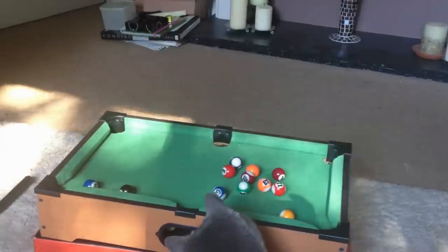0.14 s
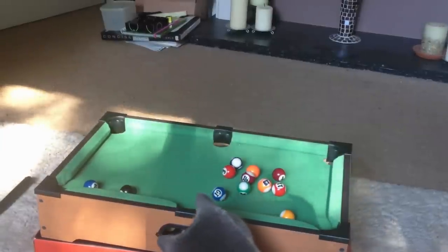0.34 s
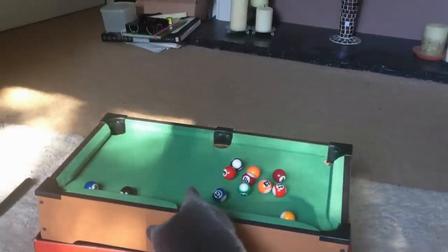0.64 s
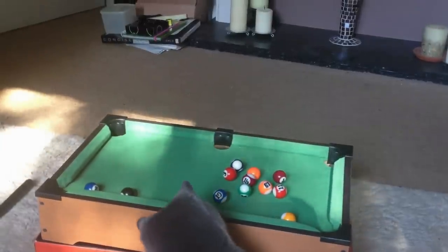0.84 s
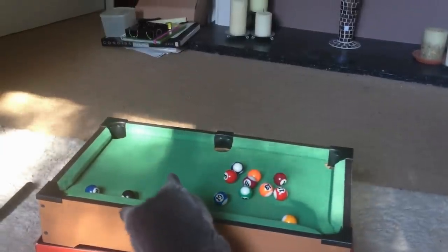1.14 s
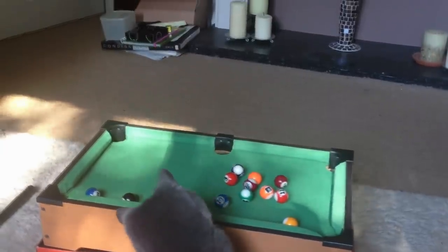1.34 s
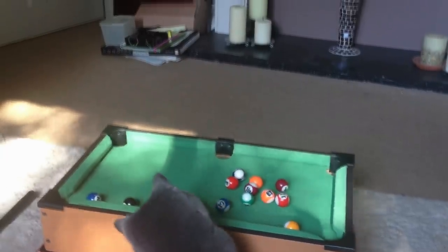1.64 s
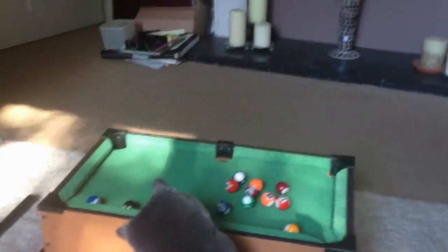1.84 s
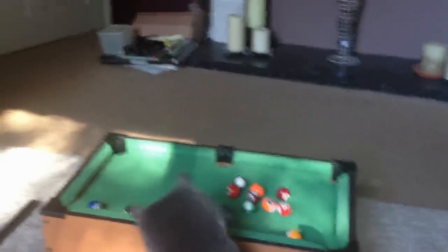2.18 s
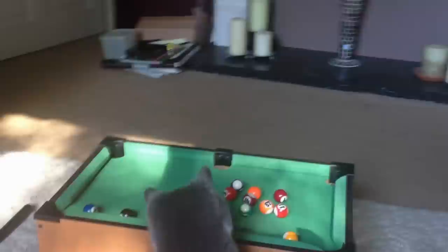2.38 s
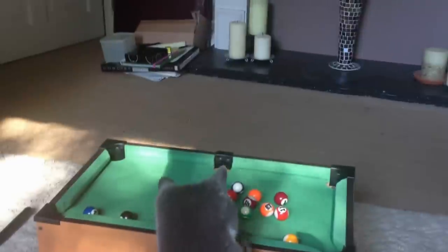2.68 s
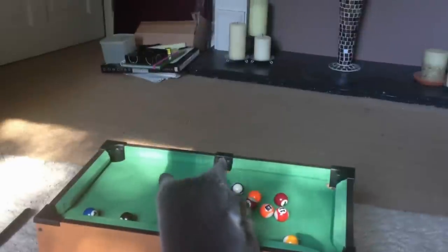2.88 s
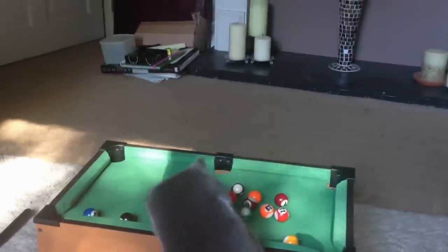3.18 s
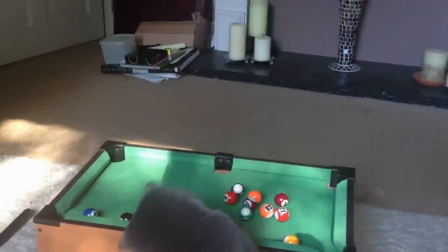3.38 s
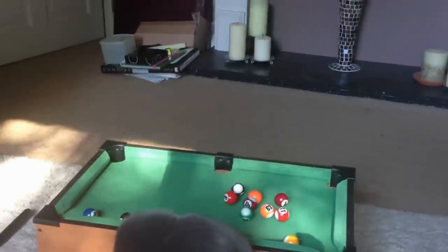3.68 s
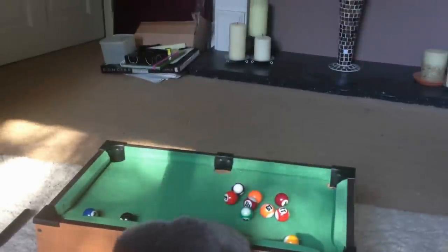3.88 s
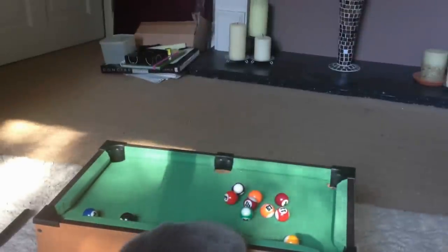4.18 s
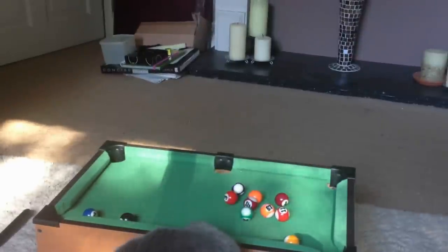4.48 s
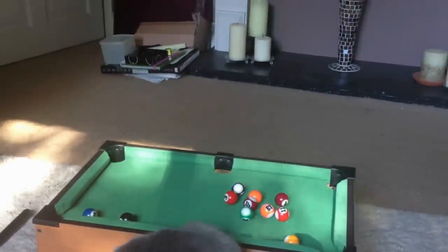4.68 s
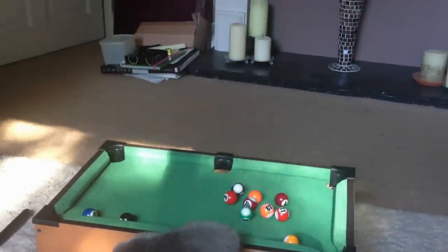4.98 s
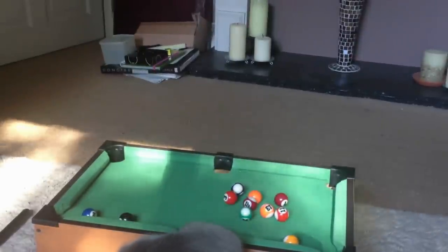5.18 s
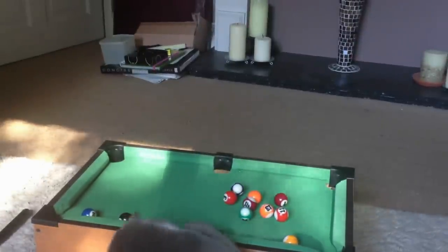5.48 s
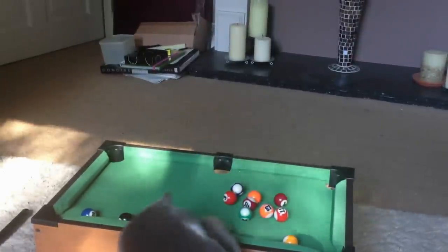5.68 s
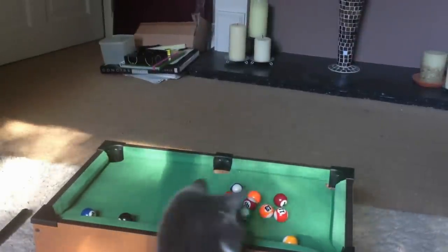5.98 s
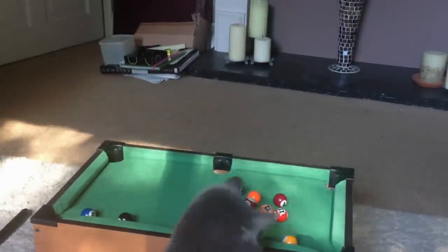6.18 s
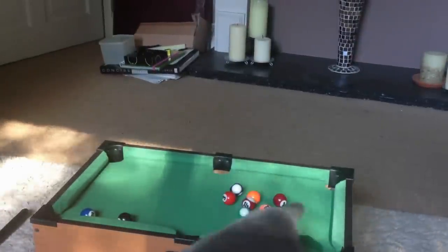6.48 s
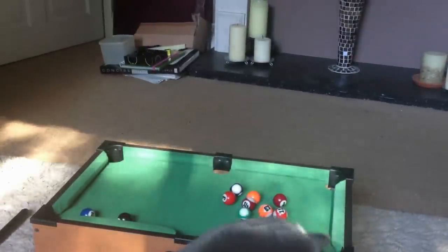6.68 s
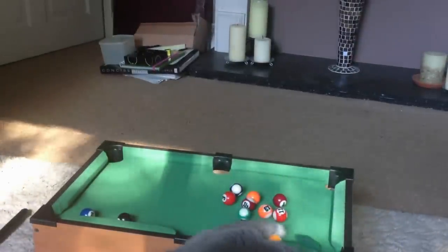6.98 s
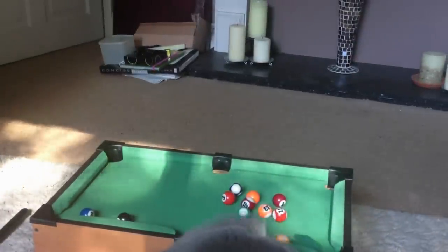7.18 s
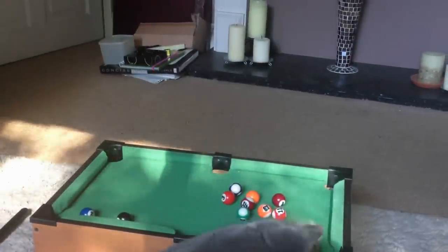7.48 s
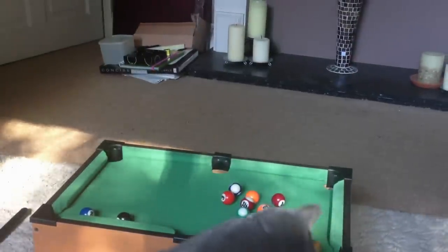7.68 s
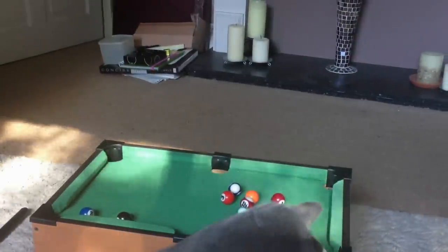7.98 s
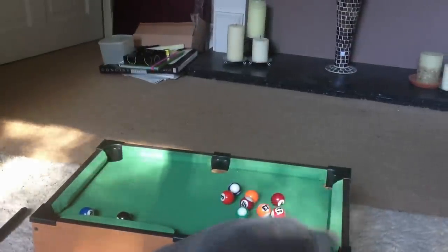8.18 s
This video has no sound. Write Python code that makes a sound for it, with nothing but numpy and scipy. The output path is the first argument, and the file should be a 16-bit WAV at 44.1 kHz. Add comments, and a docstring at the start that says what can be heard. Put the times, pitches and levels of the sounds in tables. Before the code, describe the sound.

In a quiet room, a cat paws small balls on a toy pool table. After a hushed second, the balls clack together and knock on wooden rails, then roll with dull bumps. More knocks and sharp clacks follow in loose clusters, mixed with light claw ticks. A lull holds only faint paw thuds before a ball bounces hard at a pocket and quickly settles. The small microphone picks up a short room ring.

```python
"""Small balls click together on a toy pool table as a cat paws them in a quiet living room.
Each contact is a crack that scatters through the table, wakes its modes and rings briefly in the room.
The balls knock on the wooden rails and rumble over the thin bed; the last bounces hard, as into a
pocket. In between, claws tick, paws thud on the cabinet and fur brushes the cloth."""
import sys
import numpy as np
from scipy import signal
from scipy.fft import rfft, irfft
from scipy.io import wavfile

SR = 44100
rng = np.random.default_rng(int(sys.argv[2]) if len(sys.argv) > 2 else 0)


def to_wav(sig):
    """Store sig (one row per channel, or 1-D mono) as 16-bit WAV at the path in sys.argv[1].

    Samples outside -1..1 are clipped; the rate is SR.
    """
    pcm = np.clip(np.atleast_2d(sig), -1, 1) * 32767
    pcm = np.round(pcm).astype(np.int16)
    wavfile.write(sys.argv[1], SR, pcm.T)  # frames by channels


N = 367792
AGE = np.arange(SR * 2 // 5) / SR   # time since a blow, s


def from_db(db):
    """Decibels to gain."""
    return 10 ** (np.asarray(db) / 20)


def unit(x):
    """Scale to an energy of one."""
    return x / np.sqrt(np.sum(x ** 2) + 1e-30)


def at_hz(points, hz):
    """Read a curve on a log-frequency axis."""
    f, value = np.transpose(points)
    return np.interp(np.log(np.maximum(hz, 1)), np.log(f), value)


def cut(x, hz, kind):
    """Butterworth filter."""
    return signal.sosfilt(signal.butter(2, hz, kind, fs=SR, output="sos"), x)


def equalise(x, curve, size=4096):
    """Minimum-phase EQ: nothing rings ahead of an attack."""
    cepstrum = irfft(np.log(from_db(at_hz(curve, np.fft.rfftfreq(size, 1 / SR)))))
    cepstrum[1:size // 2] *= 2
    cepstrum[size // 2 + 1:] = 0
    return signal.fftconvolve(x, irfft(np.exp(rfft(cepstrum))))[:len(x)]


def add(track, s, sound):
    """Mix a sound into a track at a time."""
    at = round(s * SR)
    track[at:at + len(sound)] += sound[:max(N - at, 0)]


def swells(rows, rise_db_per_s, fall_db_per_s):
    """Envelope of pushes that grow to a peak and die away."""
    t = np.arange(N) / SR
    return sum(from_db(db - np.maximum(rise_db_per_s * (s - t), fall_db_per_s * (t - s)))
               for s, db in rows)


# Room tone EQ: f/Hz, level/dB
HUSH_EQ = [(25, -14.5), (80, -5), (115, -8), (160, 0.5), (280, -1.5), (400, -4), (800, -8), (2800, -12),
           (5000, -14.5), (8300, -15.5), (10000, -23), (12500, -16.5), (15500, -20)]
def room_tone(level_db=-68):
    """The steady hush of a still room and microphone hiss."""
    return from_db(level_db) * np.sqrt(N) * unit(equalise(rng.standard_normal(N), HUSH_EQ))


# Reverb time: f/Hz, T60/s
ROOM_DECAY = [(120, 0.3), (320, 0.21), (800, 0.3), (2200, 0.31), (5800, 0.24), (13000, 0.22)]
def reflections(build_s=0.0072):
    """The room's answer to a click, new for every spot: octaves of noise that swell and decay."""
    tail = 0
    for hz in 125 * 2. ** np.arange(8):
        edges = hz / np.sqrt(2), min(hz * np.sqrt(2), SR / 2 - 1000)
        fade = (1 - np.exp(-AGE / build_s)) * from_db(-60 * AGE / at_hz(ROOM_DECAY, hz))
        tail += cut(rng.standard_normal(len(AGE)), edges, "band") * fade
    return unit(tail)


def ringing(modes, spread_db=2):
    """Damped sines; where the blow lands decides each one's strength and sign."""
    hz, width, db = np.transpose(modes)[:, :, None]
    strength = width * from_db(db + spread_db * rng.standard_normal(hz.shape))
    strength *= rng.choice([-1, 1], hz.shape)
    return unit(np.sum(strength * np.exp(-np.pi * width * AGE) * np.cos(2 * np.pi * hz * AGE), axis=0))


def voiced(sound, levels_db, crossovers_hz=(330, 750, 1400, 3800)):
    """Split a blow into boom, wood, knock, clack and edge; set each band's rms over the first 50 ms."""
    out = 0
    for hz, db in zip(crossovers_hz + (None,), levels_db):
        band = sound
        if hz:
            band = cut(cut(sound, hz, "low"), hz, "low")
            sound = cut(cut(sound, hz, "high"), hz, "high")
        out += band * from_db(db) / np.sqrt(np.mean(band[:SR // 20] ** 2))
    return out


def blows(hits, modes, eq, ring_db, scatter_db, scatter_s, wet_db, gain_db, ping_db=-13, ping_q=10):
    """A contact cracks, scatters through the table, wakes its modes and fills the room.
    A hit's level is its clack band before gain_db; boom, wood, knock and edge are relative to it."""
    out, click = np.zeros(N), signal.unit_impulse(len(AGE))
    scatter_fade = (1 - np.exp(-AGE / 0.0018)) * np.exp(-AGE / scatter_s)
    for s, db, click_db, ping_hz, boom, wood, knock, edge in hits:
        scatter = unit(rng.standard_normal(len(AGE)) * scatter_fade)
        room = from_db(wet_db) * reflections()
        crack = from_db(click_db) * click + from_db(scatter_db) * scatter + room
        ring = signal.fftconvolve(ringing(modes), click + from_db(-3) * room)[:len(AGE)]
        # each spot favours one resonance
        ping = signal.lfilter(*signal.iirpeak(ping_hz, ping_q, fs=SR), crack)
        sound = unit(equalise(crack, eq)) + from_db(ring_db) * unit(ring) + from_db(ping_db) * unit(ping)
        add(out, s, voiced(sound, db + np.array([boom, wood, knock, 0, edge])))
    return from_db(gain_db) * out


# Fur EQ: f/Hz, level/dB
FUR_EQ = [(80, -14.5), (300, 4), (1000, 1.5), (2800, -3), (4500, -12), (8300, -11), (15000, -32)]
# Peaks of the paw sweeps: t/s, level/dB
PAW_SWEEPS = [(1.335, -47.5), (1.61, -42), (2.36, -61), (2.945, -67), (4.64, -68), (7.21, -65.5),
              (7.78, -62)]
def fur_brushing():
    """Fur sweeps over the cloth: a soft hiss that swells with each stroke."""
    hiss = np.sqrt(N) * unit(equalise(rng.standard_normal(N), FUR_EQ))
    return swells(PAW_SWEEPS, rise_db_per_s=388, fall_db_per_s=266.5) * hiss


# Cabinet modes: f/Hz, width/Hz, level/dB
CABINET_RING = [(151.1, 22.4, -9), (233, 14, -5), (554, 29, -10)]
# Boomy cabinet EQ: f/Hz, level/dB
CABINET_EQ = [(70, -27), (150, -4), (300, -14), (700, -19.5), (1500, -26), (15000, -40)]
# Paw hits: t/s, level/dB, click/dB, ping/Hz, boom/dB, wood/dB, knock/dB, edge/dB
PAW_HITS = [(6.655, -90, -6, 247, 18, 28.3, 20, 4), (6.81, -87, -6, 178, 21, 2, -6, -2),
            (7.048, -85.5, -8, 228, 26, 18.4, -3, -1), (7.62, -85, 0, 175, 31, 26.7, 5, -2)]
def paw_thuds():
    """Soft paws wake the cabinet's low modes."""
    return blows(PAW_HITS, CABINET_RING, CABINET_EQ, ring_db=-2, scatter_db=0, scatter_s=0.0082,
                 wet_db=-0.5, gain_db=-1.5, ping_db=3, ping_q=16)


# Rumble EQ: f/Hz, level/dB
RUMBLE_EQ = [(60, -27.5), (140, -1), (260, 3), (480, 4), (800, -8), (1300, -13), (2600, -17.5),
             (4500, -23.5), (15000, -43)]
# Runs over the cloth: t/s, length/s, level/dB
BALL_RUNS = [(1.82, 0.22, -41.5), (2.24, 0.13, -62.5), (2.366, 0.61, -58), (3.72, 0.16, -51),
             (4.847, 0.93, -60.5), (7.418, 0.14, -55.5), (7.651, 0.31, -62.5), (8.077, 0.29, -48)]
# Hum peaks under a slowly pushed ball: t/s, level/dB
HUM_PEAKS = [(4.65, -54), (5.5, -61.5)]
def rolling(jolts_per_s=900, spread_db=3, speed_up_s=0.058, friction_db_per_s=12.5, stop_db_per_s=133):
    """Tiny uneven jolts of a rolling ball shake the bed; a creeping ball wakes only its lowest mode."""
    jolts = (rng.random(N) < jolts_per_s / SR) * rng.standard_normal(N)
    jolts *= from_db(spread_db * rng.standard_normal(N))
    rumble = equalise(signal.fftconvolve(jolts, reflections())[:N], RUMBLE_EQ)
    hum = cut(jolts, hz=(227, 263), kind="band")
    roll = np.zeros(N)
    for s, length_s, db in BALL_RUNS:   # the ball gathers speed, drags on the cloth and is stopped
        age = np.maximum(np.arange(N) / SR - s, 0)
        loss_db = friction_db_per_s * age + stop_db_per_s * np.maximum(age - length_s, 0)
        roll += np.minimum(age / speed_up_s, 1) * from_db(db - loss_db)
    creep = swells(HUM_PEAKS, rise_db_per_s=81, fall_db_per_s=137.5)
    return np.sqrt(N) * (roll * unit(rumble) + creep * unit(hum))


# Damped bed modes: f/Hz, width/Hz, level/dB
BUMP_RING = [(390, 94, 3.5), (944, 100, -3)]
# Dull bump EQ: f/Hz, level/dB
BUMP_EQ = [(80, -35), (200, 14), (400, -7), (1000, -11), (2300, -10), (4000, -36), (15000, -62)]
# Bump peaks before gain_db: t/s, level/dB
BUMP_HITS = [(2.257, -46.5), (2.322, -49.5), (2.508, -48), (2.535, -46), (2.562, -49.5), (2.611, -47.5),
             (2.648, -47.5), (2.679, -46.5), (2.739, -48), (2.78, -47), (2.844, -46)]
def rolling_bumps(gain_db=4, wet_db=-12, ring_db=3, soft_hz=1800):
    """A rolling ball bumps: a dull click and a swing or two of the bed, nearly dry."""
    out, click = np.zeros(N), signal.unit_impulse(len(AGE))
    for s, db in BUMP_HITS:
        ring = cut(ringing(BUMP_RING), soft_hz, "low")
        jolt = unit(equalise(click, BUMP_EQ)) + from_db(ring_db) * ring
        swing = signal.fftconvolve(jolt, click + from_db(wet_db) * reflections())
        add(out, s, from_db(db + gain_db) * swing / np.abs(swing).max())
    return out


# Claw tick modes: f/Hz, width/Hz, level/dB
CLAW_RING = [(2900, 120, -2.5), (4457, 130, -1.5), (5700, 120, -7), (8200, 300, -3.5)]
# Bright claw EQ: f/Hz, level/dB
CLAW_EQ = [(100, -19.5), (250, 0.5), (1000, -8), (1900, -7.5), (3000, 1.5), (5500, -7.5), (8500, 0),
           (10500, -12), (15000, -14)]
# Claw hits: t/s, level/dB, click/dB, ping/Hz, boom/dB, wood/dB, knock/dB, edge/dB
CLAW_HITS = [(1.2905, -43.5, -2, 3700, -34, -8, -27, -12.5),
             (1.5126, -44.5, 0.5, 3950, -11.5, -6.5, -9, -6.5),
             (1.835, -42.5, -8, 2900, -18.5, -8, -6.5, -7),
             (1.9912, -30, 2.5, 2900, -18.5, -20, -4.5, -7.5), (3.1117, -53, -14, 2840, -28, -31.5, -8, -7),
             (3.2916, -54.5, -7.5, 2980, -23.5, -4.5, -6.5, -5.5),
             (3.433, -47.5, -5.5, 2698, -3, -7, -5, -3.5), (8.0491, -39, -1.5, 8300, -5, -11, -16.5, -4.5),
             (8.0672, -38, 7, 8000, -19, -9, -31.5, -4)]
def claw_ticks():
    """Claws and grazing touches wake high, short-lived modes."""
    return blows(CLAW_HITS, CLAW_RING, CLAW_EQ, ring_db=-7, scatter_db=-1.5, scatter_s=0.0039,
                 wet_db=2, gain_db=-5.5)


# Bed modes: f/Hz, width/Hz, level/dB
BED_RING = [(238, 25, -8.5), (420, 24.6, 1), (750, 21, -1), (970, 20, -2), (1510, 72, -9.5), (2035, 56, -7)]
# Hollow bed EQ: f/Hz, level/dB
BED_EQ = [(120, -44), (204, -10.5), (319, -10), (407, -2.5), (598, -14), (899, -12.5), (995, -3.5),
          (1220, -15), (1990, -12), (2240, -22), (7920, -29.5), (15500, -51)]
# Bed hits: t/s, level/dB, click/dB, ping/Hz, boom/dB, wood/dB, knock/dB, edge/dB
BED_HITS = [(2.9488, -41.5, -20, 970, -5, 7.6, 6, -20), (3.3085, -55, -10, 975, -0.5, 9, 8, -14.5),
            (4.6445, -36.5, -8, 1990, -7.5, 4, -1, -14), (4.8517, -47.5, 0, 1980, -9.5, 5.9, 0, -14),
            (5.1602, -34, -11, 2040, -11.5, 5.5, -0.5, -11.5)]
def bed_taps():
    """A ball tapped against the thin bed rings it with a narrow ping."""
    return blows(BED_HITS, BED_RING, BED_EQ, ring_db=-2, scatter_db=1.5, scatter_s=0.005,
                 wet_db=1, gain_db=-3.5, ping_db=-7, ping_q=23)


# Rail modes: f/Hz, width/Hz, level/dB
RAIL_RING = [(447, 45, 0.5), (753, 50, 2.5), (1003, 70, -3), (1536, 21, -8.5), (1940, 96, -7),
             (2460, 83, -8.5), (3280, 60, -6.5)]
# Muffled cushion EQ: f/Hz, level/dB
CUSHION_EQ = [(100, -18), (220, 0.5), (450, -4), (1000, -3.5), (1500, -17), (2200, -15.5), (3500, -32),
              (8000, -26), (15000, -41)]
# Cushion hits: t/s, level/dB, click/dB, ping/Hz, boom/dB, wood/dB, knock/dB, edge/dB
CUSHION_HITS = [(1.152, -64, -2, 1020, 1, 5.9, 11.3, -30), (1.2238, -59.5, -4.5, 940, -10, 14.5, 14.8, -17),
                (2.372, -44, -8, 1440, -9, 3.7, 2.7, -24), (5.6964, -54, -8, 970, -10, 2, 1.8, -17),
                (7.4714, -63.5, -6, 1440, -6, 4.2, 13, 3)]
# Woody rail EQ: f/Hz, level/dB
RAIL_EQ = [(70, -53.5), (110, -28), (170, -19.5), (238, 0), (340, -10), (467, 4), (590, -10.5), (742, -2.5),
           (898, -15), (1160, -14.5), (2420, -4), (3300, -10.5), (4200, -16.5), (5900, -25.5), (8400, -19),
           (10500, -34), (15500, -40.5)]
# Rail hits: t/s, level/dB, click/dB, ping/Hz, boom/dB, wood/dB, knock/dB, edge/dB
RAIL_HITS = [(1.6346, -31, 1.5, 2330, -12.5, -1, 2, -10), (1.8472, -52, -12, 750, 0, 6, 19.5, -16),
             (1.985, -25.5, -4, 1030, -14, -8.5, 2, -19.5), (3.4715, -22.5, -2, 3100, -15, -8.5, -1, -5),
             (3.6134, -23, 0.5, 2370, -19.5, -5.5, -2.5, -10.5),
             (3.697, -34.5, -12.5, 745, -9, 0, 3.5, -10), (3.7417, -35.5, -0.5, 2180, -36, -10.5, -2, -9),
             (3.7681, -46, 0, 1930, -0.5, 7, 11, -2.5)]
def rail_knocks():
    """A ball drifting into a cushion barely rings the wooden rail; a fast one knocks on it."""
    nudges = blows(CUSHION_HITS, RAIL_RING, CUSHION_EQ, ring_db=-19.5, scatter_db=-3, scatter_s=0.009,
                   wet_db=-1, gain_db=-2)
    knocks = blows(RAIL_HITS, RAIL_RING, RAIL_EQ, ring_db=-7.5, scatter_db=0, scatter_s=0.0036,
                   wet_db=3, gain_db=-1, ping_db=-12.5)
    return nudges + knocks


# Pocket modes: f/Hz, width/Hz, level/dB
POCKET_RING = [(528, 33, -4), (563, 18, -1), (726, 12, 7), (1160, 150, -7), (1303, 15, -6),
               (1840, 110, -10), (2360, 57, -11), (2929, 16, -1), (3215, 55, -9)]
# Boxy pocket EQ: f/Hz, level/dB
POCKET_EQ = [(59, -55), (100, -30), (140, -6), (347, -20.5), (519, 0), (660, -11.5), (735, 4), (879, -12.5),
             (1310, -10.5), (1550, -20), (2990, -21.5), (4280, -24), (8410, -15), (15500, -36)]
# Bounces: t/s, level/dB, click/dB, ping/Hz, boom/dB, wood/dB, knock/dB, edge/dB
POCKET_HITS = [(8.0802, -22.5, -13, 2830, -22, -2.5, 1.5, -11.5),
               (8.143, -27, -2, 2900, -21, -10, -1, -11.5), (8.2087, -34, -4, 735, -14, 1.5, 4, -11),
               (8.2562, -37.5, -6, 2490, -13, 5.5, 1.5, -22), (8.2888, -38.5, -7, 2420, -24, 4, -10, -14),
               (8.31, -41, -13, 2540, -13, 1, -3, -22)]
def pocket_bounces():
    """A ball bounces at a pocket, quicker and softer as it settles."""
    return blows(POCKET_HITS, POCKET_RING, POCKET_EQ, ring_db=-3.5, scatter_db=0, scatter_s=0.0023,
                 wet_db=2, gain_db=0)


# Modes woken by a clack: f/Hz, width/Hz, level/dB
CLACK_RING = [(465, 50, 0.5), (682, 25, -11.5), (1179, 13, 4), (1560, 91, 2.5), (1730, 19, -9.5),
              (1884, 35, -5), (2365, 160, 2), (2937, 17, 0.5)]
# Clack EQ: f/Hz, level/dB
CLACK_EQ = [(70, -57), (130, -26.5), (380, -8.5), (490, 3.5), (620, -12.5), (760, -3.5), (1000, -11),
            (1250, -7.5), (2400, -5.5), (3000, -8), (3700, -18), (5500, -21), (8300, -20), (10500, -36.5),
            (15500, -49.5)]
# Collisions: t/s, level/dB, click/dB, ping/Hz, boom/dB, wood/dB, knock/dB, edge/dB
CLACK_HITS = [(0.1045, -54.5, -4, 1670, -18, 0.5, 8, -40), (1.3376, -27.5, 4, 2200, -25.5, -17, 0, -12),
              (1.6103, -34.5, -5, 1510, -28, -4.5, 1.5, -26), (1.8043, -29.5, 2, 2600, -23, -8.5, -4, -16),
              (4.9134, -34, -8, 1670, -15.5, -11, -2.5, -23.5),
              (4.9939, -24.5, 0, 1750, -22.5, -13.5, -6, -17.5), (5.2554, -23, 0, 1667, -20, -14, -6, -19),
              (7.414, -46.5, -6, 1845, -2.5, -10, 2.5, -20)]
def ball_clacks():
    """Ball strikes ball: a hard crack that rings both table and room."""
    return blows(CLACK_HITS, CLACK_RING, CLACK_EQ, ring_db=-1, scatter_db=4, scatter_s=0.0049,
                 wet_db=5.5, gain_db=-1)


def scene():
    """The balls and the cat over the hush of the room, in mono."""
    balls = ball_clacks() + rail_knocks() + bed_taps() + pocket_bounces() + rolling_bumps() + rolling()
    cat = claw_ticks() + paw_thuds() + fur_brushing()
    return (balls + cat + room_tone())[None]


def record(dry, bass_hz=85, top_hz=15700):
    """A small microphone loses the deep bass; the top of the treble is cut steeply."""
    steep_lowpass = signal.ellip(10, .2, 80, top_hz, fs=SR, output="sos")
    return signal.sosfilt(steep_lowpass, cut(dry, bass_hz, "high"))


dry = scene()
out = record(dry)
to_wav(out)
```